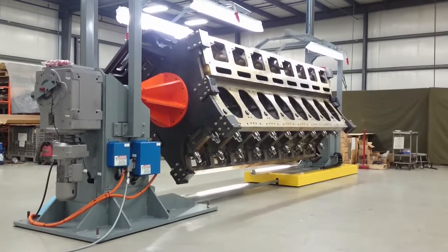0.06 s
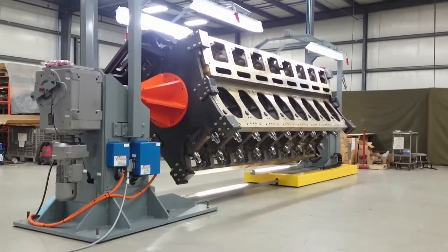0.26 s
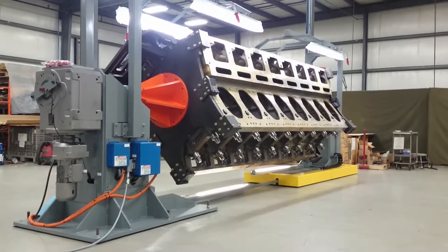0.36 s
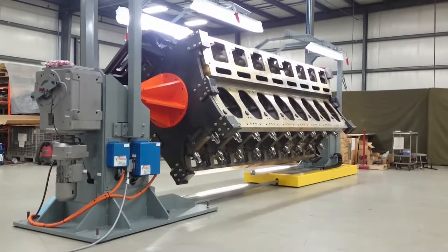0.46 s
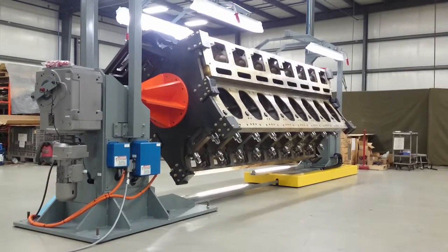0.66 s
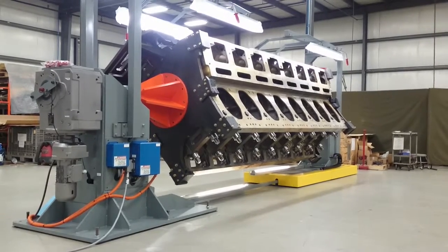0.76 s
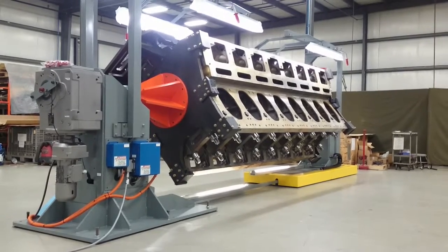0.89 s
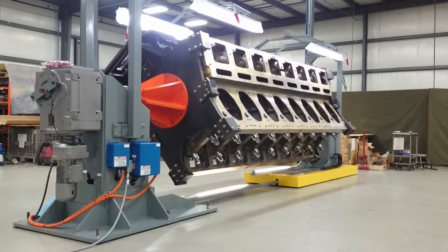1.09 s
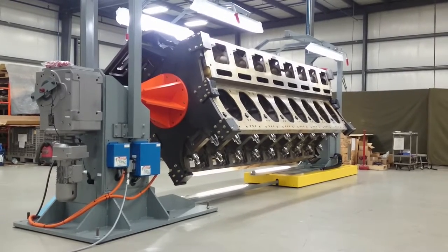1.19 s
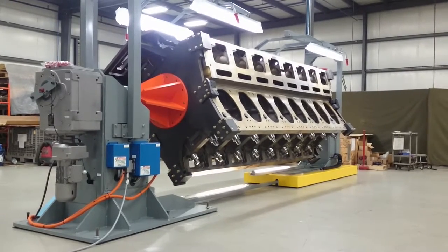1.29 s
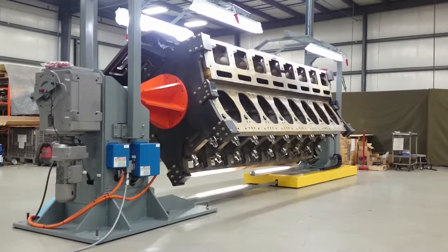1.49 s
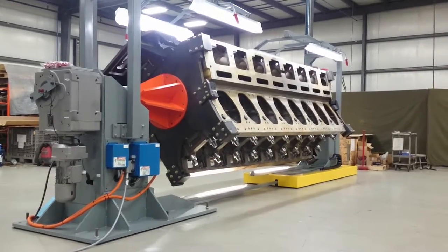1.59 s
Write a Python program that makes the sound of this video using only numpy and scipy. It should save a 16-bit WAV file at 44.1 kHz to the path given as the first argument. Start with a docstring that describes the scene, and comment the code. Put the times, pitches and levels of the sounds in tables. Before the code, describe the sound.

An engine stand's electric motor starts: its brake scrapes briefly and snaps open with a close, ringing metal clunk that echoes around a workshop hall. A thin, high whine and gear whir then build over a low rumble and ventilation hum.

```python
"""Engine stand starting up

A motorised stand starts to turn a large engine block in a steel workshop hall. The motor's brake
scrapes and snaps open with a ringing clunk that echoes off the walls. The inverter ramps the motor
up, its switching whine fanning out into sidebands while the gearbox whirs over the hum of the hall."""
import sys
import numpy as np
from scipy import signal
from scipy.fft import rfft, irfft, next_fast_len
from scipy.io import wavfile
from scipy.ndimage import map_coordinates

SR = 44100
rng = np.random.default_rng(int(sys.argv[2]) if len(sys.argv) > 2 else 0)


def digitize_waveform(pressure):
    """Quantize a signal to 16-bit integers and store it at the path in sys.argv[1].

    Rows of a 2-D input are taken as channels; values are limited to [-1, 1].
    """
    field = np.atleast_2d(pressure).T
    bounded = np.clip(field, -1, 1)
    quanta = np.round(bounded * 32767).astype(np.int16)
    wavfile.write(sys.argv[1], SR, quanta)


N = 72765
TIME = np.arange(N) / SR
START_S, RAMP_HZ_PER_S, FULL_HZ, SWITCH_HZ = .21, 47, 59.5, 4000  # the inverter's settings

# Panning of the frame's rumble and the hall's echo. Each row: frequency in Hz, left minus right in dB.
ROOM_PAN = [(60, -6.5), (700, -4), (1300, -6), (2400, 0), (4000, -0.5), (5400, -9), (7000, -5.5), (9000, 2),
            (15000, -7)]


def clunk():
    """The brake plate's quick hits and a faint reflection; returns the crack and the housing's ring."""
    # The plate's hits, then a faint early reflection of them.
    # Each row: start in seconds, relative level in dB.
    onsets = [(0.2838, -19.5), (0.2857, -16), (0.291, -28.5), (0.2925, -28.5), (0.3131, -33),
              (0.3234, -37.5)]
    # The steel housing's modes. Each row: frequency in Hz, relative level in dB, seconds to fall 60 dB.
    modes = [(555, -15, .06), (609, -10, .12), (1066, -9.5, .13), (1330, -8.5, .09), (1417, -11, .09),
             (1722, 3.5, .11), (1778, -11, .08), (1935, -2, .04), (2200, -17, .1), (2680, -13, .07),
             (4020, -18, .07), (5031, -5.5, .08), (5130, -6.5, .07), (5610, -4.5, .08)]
    # Tone of the crack. Each row: frequency in Hz, relative level in dB.
    crack_eq = [(30, -50), (100, -8), (350, -14.5), (550, -2), (850, -7), (1400, -2), (2600, -5.5),
                (4000, -4.5), (4700, -4), (5300, -1.5), (6200, -5), (7500, -8.5), (13000, -8.5),
                (16000, -12.5)]

    def struck(t60_s, attack_s):
        power = 0
        for start, db in onsets:
            age = np.maximum(TIME - start, 0)
            power += (amp(db - 60 * age / t60_s) * (1 - np.exp(-age / attack_s))) ** 2
        return np.sqrt(power)

    ring = 0
    for hz, db, t60_s in modes:
        phase = 2 * np.pi * (hz * TIME + rng.random()) + .4 * wobble(91.4)  # jitter blurs the pitch
        ring += amp(db) * struck(t60_s, attack_s=.00036) * np.sin(phase)
    crack = struck(t60_s=.033, attack_s=.00016) * noise(crack_eq)
    return amp(.55) * crack, amp(-6.5) * ring


def scrape():
    """The brake plate slides unevenly as its magnet pulls, and hums briefly on its own note."""
    # Swell of the slide before the snap. Each row: time in seconds, level in dB.
    swell = [(.203, -60), (.21, -45), (.218, -45), (.221, -37.5), (.235, -32.5), (.25, -32.5), (.265, -38),
             (.283, -43), (.3, -66.5)]
    # Tone of the rubbing. Each row: frequency in Hz, relative level in dB.
    rub_eq = [(40, -60), (200, -43), (370, -21), (450, 3.5), (560, -0.5), (900, -1), (1300, -0.5),
              (2400, 4), (3300, -3), (5000, -7.5), (7500, -19), (15000, -35)]
    return amp(curve(swell)) * (noise(rub_eq) + amp(-12) * narrow(455.4, width_hz=40))


def inverter_whine():
    """Sidebands spread from multiples of the switching rate as the drive frequency climbs."""
    # The four speed marks, as shares of full speed.
    marks = [.2, .58, .85, 1]
    # Hiss around the tones. Each row: multiple of the switching rate, width in Hz, dB at each mark.
    skirts = [(2, 800, -76, -63.5, -61.5, -61.5), (3, 1000, -76, -68.5, -64.5, -63)]
    # The tones. Each row: multiple of the switching rate, offset in drive frequencies, dB at each mark.
    sidebands = [(1, .5, -79, -73, -65, -71), (1, -1.5, -85, -78, -71, -76), (2, -8, -77, -57, -56.5, -65),
                 (2, -1, -80, -65, -60, -58), (2, 0, -75, -67, -63, -64), (2, 1, -78, -72, -69, -71),
                 (2, 8, -82, -66, -59.5, -67), (2, 7, -90, -81, -73, -72), (3, -6.5, -90, -73, -68, -69),
                 (3, -4.5, -92, -84, -77, -75), (3, -2.5, -88, -75, -71, -72),
                 (3, -1.5, -80, -73, -68, -66), (3, .5, -81, -78, -73, -75), (3, 1.5, -88, -79, -67, -66),
                 (3, 2.5, -92, -82, -68, -65), (3, 7.5, -92, -82, -73, -74), (3, 9.5, -92, -80, -69, -71),
                 (4, -5, -100, -70, -76, -78)]
    # Panning of the whine. Each row: frequency in Hz, left minus right in dB.
    pan = [(4000, 2), (8000, 2), (12000, -5), (15700, -22)]
    flutter_db, blur = 2, .25
    speed = motor_speed()
    drive_cycles = np.cumsum(speed * FULL_HZ) / SR
    whine = np.zeros((2, N))
    for multiple, width_hz, *levels_db in skirts:
        for ear in whine:
            ear += amp(np.interp(speed, marks, levels_db)) * narrow(multiple * SWITCH_HZ, width_hz)
    for multiple, offset, *levels_db in sidebands:
        phase = 2 * np.pi * (multiple * SWITCH_HZ * TIME + offset * drive_cycles + rng.random())
        level_db = np.interp(speed, marks, levels_db)
        for ear in whine:
            tone = np.sin(phase + wobble(4)) + blur * wobble(70) * np.cos(phase)
            ear += np.sqrt(2) * amp(level_db + flutter_db * wobble(9.52)) * tone
    fade_in = np.minimum(speed * 10, 1)
    return panned(whine * fade_in, pan)


def gearbox():
    """The gears whir louder with speed and make their case sing."""
    # Tone of the whir. Each row: frequency in Hz, relative level in dB.
    whir_eq = [(100, -1), (400, 3.5), (780, -1.5), (1100, -22), (1700, 2.5), (2600, -22), (4100, -9),
               (6000, -14), (7000, -19), (9500, -25), (13300, -13), (15700, -25)]
    # The case's resonances. Each row: frequency in Hz, width in Hz, level at full speed in dB.
    resonances = [(765, 45, -60.5), (1900, 65, -59)]
    # Panning of the gearbox. Each row: frequency in Hz, left minus right in dB.
    pan = [(400, -3.5), (1200, -3.5), (2500, -2), (4500, 5), (6000, -15), (8000, 2), (12000, -3)]
    full_db, growth_db, rough_db = -49.5, 4, 2
    speed = motor_speed()
    level_db = full_db + growth_db * (speed - 1) + rough_db * wobble(120)
    fade_in = np.minimum(speed * 10, 1)
    whir = amp(level_db) * noise(whir_eq) * fade_in
    case = [sum(amp(db) * narrow(hz, width) for hz, width, db in resonances) for ear in range(2)]
    return panned(whir + np.sqrt(speed) * case, pan)


def motor_speed():
    """Share of full motor speed: a straight ramp, then steady."""
    return np.clip((TIME - START_S) * RAMP_HZ_PER_S / FULL_HZ, 0, 1)


def frame_rumble():
    """The frame rumbles while it accelerates the load, then eases off."""
    # Envelope of the rumble. Each row: time in seconds, level in dB.
    envelope = [(.2, -46.5), (.45, -50.5), (.7, -49.5), (.95, -49.5), (1.25, -49), (1.42, -58.5),
                (1.65, -61)]
    # Tone of the rumble. Each row: frequency in Hz, relative level in dB.
    rumble_eq = [(25, -36), (45, -10), (62, -8), (78, 7), (98, -4.5), (130, -1.5), (200, -1), (265, -7),
                 (312, 5), (385, -13.5), (800, -44)]
    return panned(amp(curve(envelope)) * noise(rumble_eq), ROOM_PAN)


def early_reflections(x, gain_db=-12, delay_s=.007, t60_s=.066):
    """The engine block and the floor scatter a short burst of reflections."""
    # Tone of the scatter. Each row: frequency in Hz, relative level in dB.
    scatter_eq = [(300, -10), (1500, -4), (2800, 10), (5400, -3), (7000, -3), (14000, -3)]
    burst = noise(scatter_eq) * amp(-60 * TIME / t60_s)
    wet = signal.fftconvolve(x, burst / np.linalg.norm(burst[0]), axes=1)[:, :N]
    return filtered(wet, lambda hz: amp(gain_db) * np.exp(-2j * np.pi * hz * delay_s))


def hall_echo(x, gain_db=.5, delay_s=.022):
    """The far walls answer after a gap; each frequency dies at its own speed."""
    # The hall's decay. Each row: frequency in Hz, seconds to fall 60 dB.
    decay = [(300, 0.75), (1000, 0.58), (2300, 0.97), (5000, 1), (8000, 0.83), (14000, 0.43)]
    # Tone of the echo. Each row: frequency in Hz, gain in dB.
    echo_eq = [(300, -2), (600, -7), (800, 1), (1050, 3.5), (1400, 2), (1720, 1.5), (2300, 2.5), (4000, 2),
               (5400, -1), (8000, -1), (14000, -7)]
    bands, age, white = signal.stft(noise([(20, 0), (20000, 0)]), SR, nperseg=256)
    tail = signal.istft(white * amp(-60 * age / along(decay, bands)[:, None]), SR, nperseg=256)[1]
    wet = signal.fftconvolve(x, tail / np.linalg.norm(tail[0]), axes=1)[:, :N]
    wet = filtered(wet, lambda hz: amp(gain_db + along(echo_eq, hz)) * np.exp(-2j * np.pi * hz * delay_s))
    return panned(wet, ROOM_PAN)


def room_tone():
    """Ventilation noise with slightly unsteady mains and fan tones."""
    # Mains and fan hum. Each row: frequency in Hz, level in dB.
    tones = [(59.3, -57.5), (120.5, -57), (292, -64.5), (1885, -71)]
    # Tone of the ventilation. Each row: frequency in Hz, relative level in dB.
    air_eq = [(15, -61), (25, -38), (48, -6.5), (91, -9), (135, -9), (260, -8.5), (297, -11), (469, -13),
              (614, -11), (848, -9.5), (2120, -12), (3170, -17.5), (5500, -24.5), (7900, -44), (15500, -42)]
    # Panning of air and hum. Each row: frequency in Hz, left minus right in dB.
    pan = [(60, -4.5), (400, -2), (1200, -9), (2500, -1.5), (8000, -5)]
    hum = 0
    for hz, db in tones:
        level = np.sqrt(2) * amp(db + .5 * wobble(7.3))
        hum += level * np.sin(2 * np.pi * hz * TIME + .38 * wobble(9.04))
    return panned(amp(-47) * noise(air_eq) + hum, pan)


def noise(eq):
    """Stereo noise of rms 1 shaped by an EQ curve, centred in the bass and wide in the treble."""
    # Stereo likeness. Each row: frequency in Hz, correlation of left and right.
    likeness = [(60, 0.88), (250, 0.92), (500, 1), (1000, 0.84), (2000, 0.21), (8000, 0.085)]

    def mid_side_gains(hz):
        angle = np.arccos(along(likeness, hz)) / 2
        return amp(along(eq, hz)) * [np.cos(angle), np.sin(angle)]

    mid, side = filtered(rng.standard_normal((2, N)), mid_side_gains)
    return unit(np.array([mid + side, mid - side]))


def narrow(hz, width_hz):
    """Noise of rms 1 in a narrow band."""
    phase = 2 * np.pi * hz * TIME
    return unit(wobble(width_hz) * np.cos(phase) + wobble(width_hz) * np.sin(phase))


def wobble(rate):
    """A smooth random curve, rate knots a second."""
    return map_coordinates(rng.standard_normal(N // 20), [TIME * rate], mode='wrap')


def panned(x, pan):
    """Place each frequency between left and right."""
    return filtered(x, lambda hz: amp(np.outer([1, -1], along(pan, hz)) / 2))


def lagged(x, lag_s):
    """The sound reaches the right ear lag_s after the left."""
    return filtered(x, lambda hz: np.exp(1j * np.pi * np.outer([1, -1], hz) * lag_s))


def filtered(x, response):
    """Apply a frequency response, given as a function of Hz."""
    size = next_fast_len(N + SR // 2)
    return irfft(rfft(x, size) * response(np.fft.rfftfreq(size, 1 / SR)), size)[..., :N]


def along(rows, hz):
    """Read (Hz, value) rows on a log frequency axis."""
    freqs, values = np.transpose(rows)
    return np.interp(np.log(hz + 1), np.log(freqs + 1), values)


def curve(rows):
    """One value per sample from (seconds, value) rows."""
    return np.interp(TIME, *np.transpose(rows))


def amp(db):
    """Decibels to amplitude."""
    return 10 ** (np.asarray(db) / 20)


def unit(x):
    """Scale to rms 1."""
    return x / np.sqrt(np.mean(x ** 2) + 1e-20)


def scene():
    """The brake and its echo, the running drive and the hall's own noise."""
    # Panning of the close brake sound. Each row: frequency in Hz, left minus right in dB.
    brake_pan = [(600, -3), (1000, -7), (1400, -6.5), (1720, -7.5), (2400, -3), (4000, 0), (5300, -9),
                 (6500, -5), (9000, 0), (14000, -7)]
    crack, ring = clunk()
    slide = scrape()
    brake = panned(crack + ring + slide + early_reflections(crack + ring), brake_pan)
    echo = hall_echo(crack + amp(-13) * ring + amp(-4.5) * slide)
    bed = echo + gearbox() + frame_rumble() + room_tone()
    return lagged(brake, lag_s=.00021) + lagged(bed, lag_s=.000293) + inverter_whine()


def record(dry):
    """A steep high cut takes off the very top."""
    cutoff_hz, transition_hz = 15950, 300
    return filtered(dry, lambda hz: np.clip((cutoff_hz - hz) / transition_hz + .5, 0, 1))


dry = scene()
out = record(dry)
digitize_waveform(out)
```